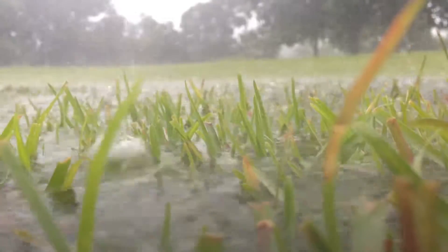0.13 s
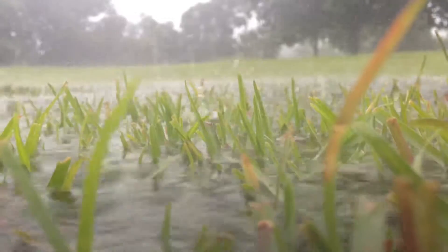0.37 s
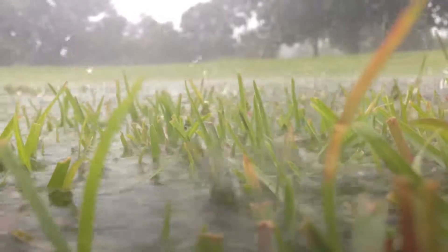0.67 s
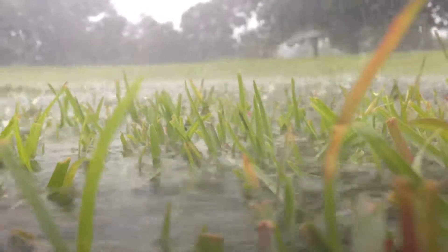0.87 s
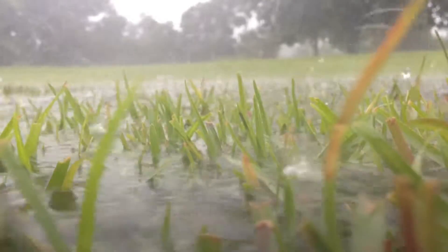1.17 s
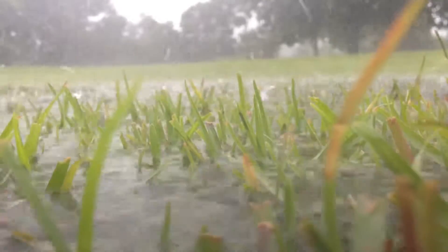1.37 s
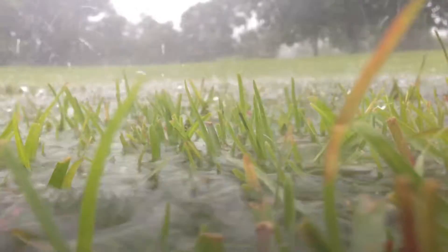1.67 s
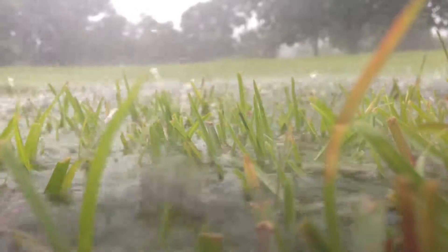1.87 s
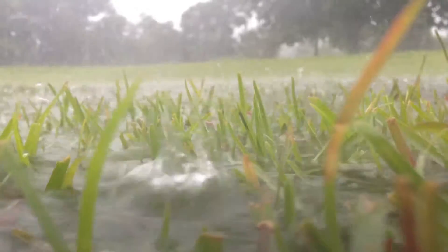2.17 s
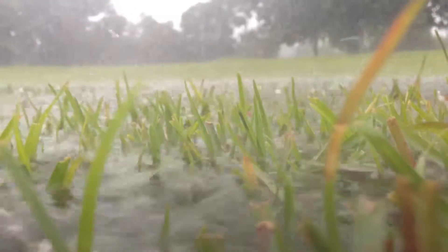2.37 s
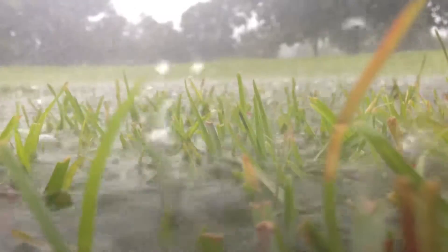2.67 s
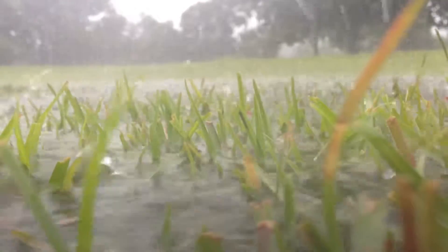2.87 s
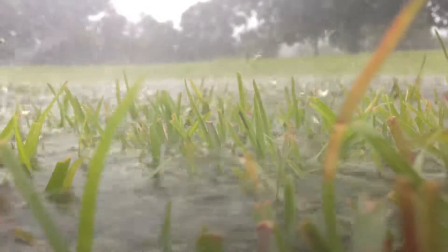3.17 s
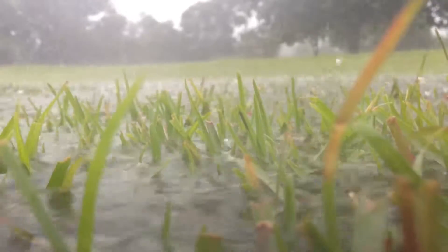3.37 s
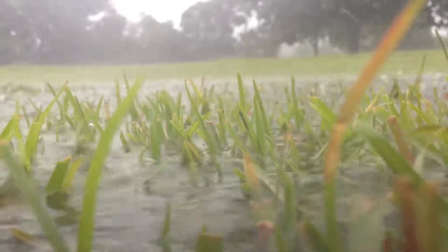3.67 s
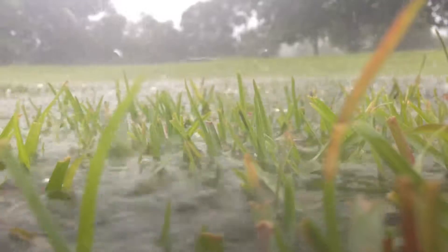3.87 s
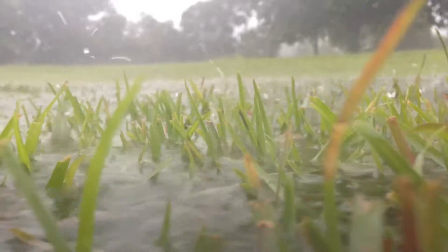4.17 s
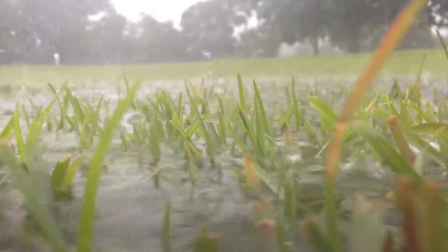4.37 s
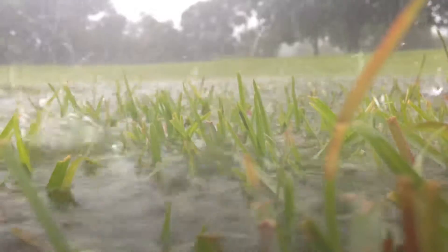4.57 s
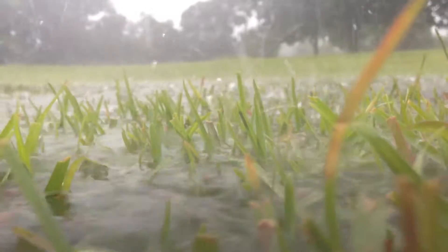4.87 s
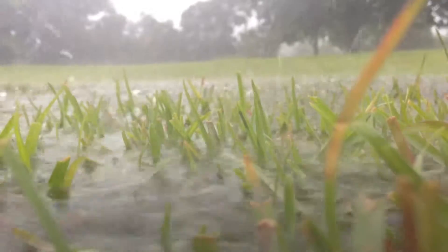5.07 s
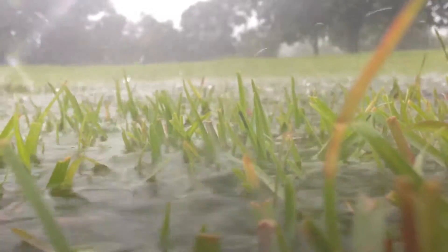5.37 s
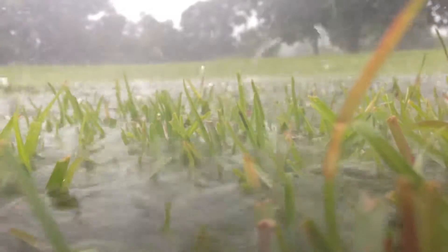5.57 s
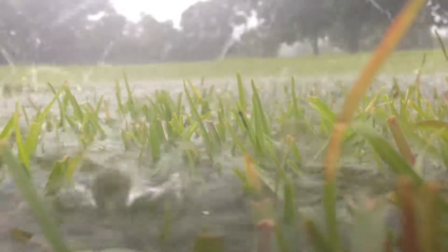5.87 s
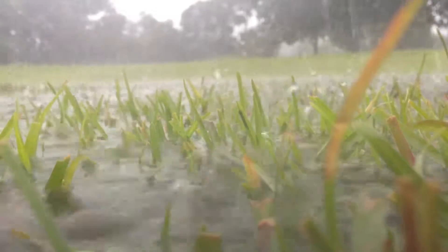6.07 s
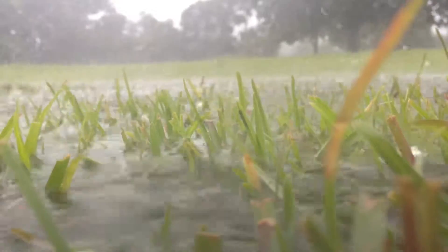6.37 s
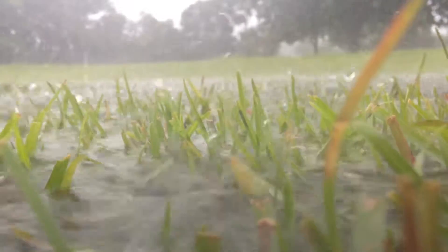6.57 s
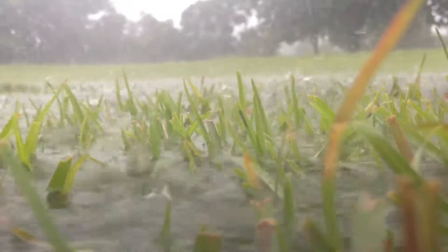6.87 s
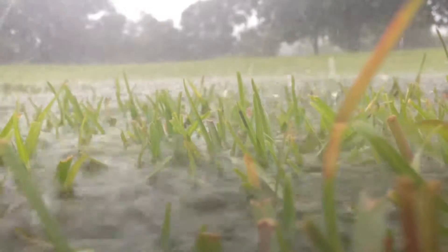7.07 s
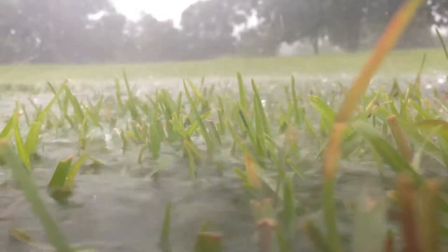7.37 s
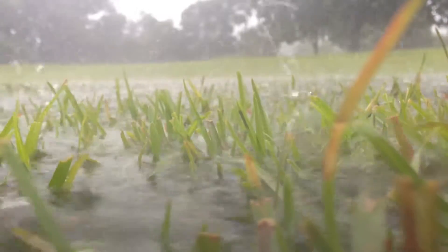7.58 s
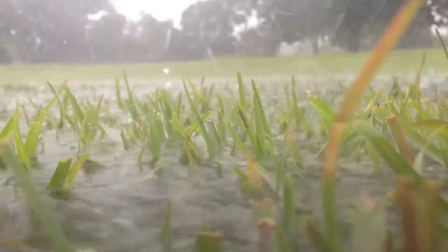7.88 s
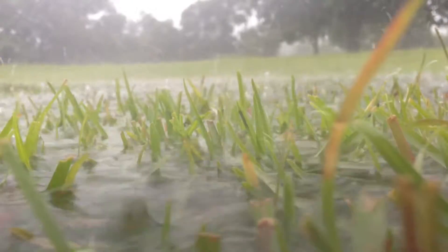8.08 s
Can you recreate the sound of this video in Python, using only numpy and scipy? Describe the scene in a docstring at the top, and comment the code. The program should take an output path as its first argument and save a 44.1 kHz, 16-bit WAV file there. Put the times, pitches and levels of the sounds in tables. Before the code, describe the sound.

Close, dull thumps and knocks of large raindrops strike a waterproof case several times a second, with the microphone shut inside it, low in waterlogged grass. Behind them runs the quieter, boxy patter of a downpour, sinking briefly after the hardest blows. Short pings, thin high ticks and a few faint bubble plinks are scattered throughout. The drops bunch into a quick cluster late on, and the rain keeps going.

```python
"""Heavy rain on a flooded lawn, heard from inside a sealed camera housing that stands in the water.
From the start, countless small drops make a muffled wash, while big ones thud and knock on the shell
and ring the air pocket in front of the microphone. After hard blows the wash ducks and creeps back.
Droplets tick as they burst on the wet port, the tube to the microphone: loudest near 3.5, 5.8 and
7.2 s. A last flurry of pings comes around 7.6 s, and the rain goes on to the end."""
import sys
import numpy as np
from scipy import signal
from scipy.fft import rfft, irfft, next_fast_len
from scipy.io import wavfile
from scipy.ndimage import uniform_filter1d, map_coordinates

SR = 44100
rng = np.random.default_rng(int(sys.argv[2]) if len(sys.argv) > 2 else 0)


def store_pcm(level_fs):
    """Save levels as 16-bit WAV."""
    pcm = np.round(np.clip(level_fs, -1, 1) * 32767).astype(np.int16)
    wavfile.write(sys.argv[1], SR, np.atleast_2d(pcm).T)


N = 363384

# Levels are starting values, before later shaping. "Loss" is how fast a ring dies away.
# strength of the background rain: t/s, wash level/dB, patter level/dB
RAIN_STRENGTH = [(0, -39, -43), (1, -43.5, -38), (2, -42.5, -42.5), (3, -43, -41.5), (4, -41, -40.5),
                 (5, -41, -41), (6, -41, -39), (7, -41.5, -42), (8.24, -41, -43.5)]
# tone colour of far rain through the shell: f/Hz, level/dB
WASH_COLOUR = [(18, -41.5), (30, -15.5), (90, -2), (130, -16.5), (213, -7.5), (591, -24), (970, -20.5),
               (1110, -24.5), (1550, -2), (1970, -19), (2760, -25.5), (3780, -40), (5310, -45),
               (15500, -56)]
# sudden dips of the background: t/s, depth/dB
BACKGROUND_DUCKS = [(0.04, 13), (0.91, 4.5), (1.235, 7), (1.589, 9), (2.075, 11), (2.29, 8.5), (4.05, 12.5),
                    (4.96, 3.5), (5.405, 12.5), (6.51, 4.5), (6.89, 12.5), (7.275, 6), (7.552, 12.5),
                    (7.618, 12.5)]
# notes the shell goes on ringing with: f/Hz, width/Hz, level/dB
SHELL_NOTES = [(210.8, 51, -5.5), (486, 36, -9), (861, 96, -4)]
# bubbles closing beside the port: t/s, level/dB, starting f/Hz, loss/dB per cycle
CLOSING_BUBBLES = [(1.2115, -24, 1750, 3), (2.256, -29, 1200, .9), (2.632, -34, 1400, 1),
                   (7.4115, -23, 1480, 3), (7.4315, -19, 1650, 4), (7.778, -24, 500, 4)]
# tiny bubbles that squeak in the port: t/s, level/dB
PORT_SQUEAKS = [(1.493, -35), (4.9653, -30.5), (5.0467, -30), (6.295, -34.5)]
# droplets bursting on the port: t/s, level/dB, f/Hz
PORT_TICKS = [(0.0287, -43, 4900), (0.033, -50.5, 4130), (0.1004, -45.5, 7400), (0.1613, -50, 8400),
              (.5285, -47, 6130), (.7356, -52, 4660), (0.909, -44.5, 4600), (0.9656, -48.5, 9000),
              (.9844, -40, 5100), (0.994, -36.5, 5800), (1.0072, -48, 7000), (1.0326, -43, 5500),
              (1.038, -39.5, 6300), (1.098, -42, 5440), (1.23, -45.5, 5540), (1.2722, -38.5, 10600),
              (1.2743, -42.5, 5040), (1.4142, -45, 6540), (1.5828, -42, 3870), (1.5917, -37, 3860),
              (1.601, -46, 4750), (1.69, -43.5, 5900), (1.741, -48.5, 7700), (1.7456, -51.5, 8900),
              (2.0752, -42, 3870), (2.519, -43.5, 8450), (2.6612, -48, 7000), (2.751, -24, 5440),
              (2.779, -20, 6450), (2.911, -41.5, 6400), (3.012, -48.5, 8340), (3.178, -37.5, 7060),
              (3.3687, -45, 3830), (3.505, -12.5, 6700), (4.045, -45.5, 4800), (4.252, -47.5, 3560),
              (4.3086, -37, 5960), (4.334, -52, 7300), (4.3428, -45.5, 7600), (4.396, -56, 5200),
              (4.527, -56, 7800), (4.625, -45, 4170), (4.7067, -49, 5900), (4.71, -39, 8600),
              (4.7118, -43, 5000), (4.7359, -41.5, 7200), (4.883, -44.5, 4100), (5.09, -31, 4700),
              (5.555, -40.5, 7060), (5.663, -40, 6700), (5.7601, -45, 5400), (5.7883, -13.5, 4840),
              (5.8088, -32, 7300), (5.8961, -28, 7800), (6.0457, -42, 6200), (6.495, -43, 6660),
              (6.512, -45, 5230), (6.6751, -46.5, 6200), (6.7598, -47, 9200), (6.9593, -42, 5230),
              (7.167, -11.5, 7180), (7.272, -40.5, 3800), (7.5332, -43, 5070), (7.537, -25.5, 3930),
              (7.5495, -42.5, 5400), (7.602, -50, 8200), (7.6113, -43.5, 5860), (7.6153, -40.5, 4500),
              (7.7375, -53, 6850), (7.9688, -49, 7800)]
# drops that ring the air pocket: t/s, level/dB, f/Hz, loss/dB per cycle
POCKET_PINGS = [(.0068, -20.5, 1430, 3.5), (0.0185, -12, 1310, 8), (.0235, -1, 1490, 5),
                (.0344, -2, 1530, 5), (.7358, -17, 1580, 5), (1.1542, -23.5, 1600, 2.5),
                (1.2319, -9, 1480, 3), (1.302, -17, 1380, 5), (1.4275, -8, 1520, 2.5),
                (1.4925, -15, 1470, 7.5), (1.5836, -4, 1470, 3), (1.5913, -8, 1420, 2.5),
                (1.6018, -18.5, 1520, 3.5), (1.7462, -15.5, 1500, 7), (2.0748, -3.5, 1450, 7),
                (2.291, -1.5, 1420, 10), (2.4046, -23.5, 1300, 2.5), (2.6442, -21.5, 1680, 1.5),
                (2.7285, -22, 1530, 2.5), (2.7762, -14.5, 1560, 5.5), (3.1787, -15.5, 1510, 7),
                (3.3688, -22.5, 1550, 2.5), (3.5048, -6, 1497, 3), (3.515, -24.5, 1534, -0.5),
                (3.5212, -15, 1580, 4.5), (3.7611, -13.5, 1430, 7.5), (3.847, -23.5, 1426, 1.5),
                (4.0458, -6, 1444, 4), (4.3624, -9.5, 1460, 2.5), (4.7366, -24.5, 1446, 2.5),
                (4.8823, -12.5, 1510, 2), (4.9642, -3, 1530, 4), (4.9913, -11, 1330, 11),
                (5.0471, -17, 1550, 7.5), (5.0899, -11, 1590, 13.5), (5.4004, -12, 1530, 2),
                (5.5542, -13, 1510, 4.5), (5.6604, -18.5, 1480, 3.5), (5.7843, -13, 1360, 5),
                (5.7906, -16, 1270, 7), (5.8109, -14.5, 1420, 7), (5.917, -24, 1560, 1.5),
                (6.295, -19, 1520, 2.5), (6.381, -16, 1310, 3.5), (6.4944, -14, 1530, 2.5),
                (6.5112, -11, 1400, 4), (6.8857, -6.5, 1507, 3), (6.9954, -16.5, 1500, 1.5),
                (7.1671, -13.5, 1780, 6), (7.2727, -5, 1400, 6.5), (7.5336, -14, 1590, 5),
                (7.5369, -0.5, 1570, 5), (7.5497, -7, 1520, 4.5), (7.5561, -23, 1330, 2),
                (7.614, -29, 1540, 8), (7.6153, -2, 1540, 7), (7.7378, -25.5, 1470, 5.5)]
# big drops on the shell: t/s, then level/dB, f/Hz, loss/dB per cycle for the thud and again for the knock
BIG_DROPS = [(0.014, -13, 217, 29, -21, 590, 3), (0.0183, -8.5, 127, 44, -3, 590, 26),
             (0.022, -33, 242, 15, -1, 543, 13.5), (0.034, -29, 314, 7, -18, 1020, 30),
             (0.3331, -3, 114, 47, -13, 345, 21), (0.634, -26, 194, 10.5, -20, 682, 32),
             (0.6947, -25, 240, 16, -27, 375, 7.5), (0.7694, -7, 104, 28, -16, 433, 35),
             (0.801, -30, 240, 8, -24, 682, 33), (0.8429, -39, 310, 16, -4, 536, 30),
             (0.8912, 1.5, 173, 45, -9, 380, 9.5), (0.9087, 13, 110, 45.5, -16, 344, 5),
             (0.9659, -16, 79, 16, -5, 320, 30), (0.9774, -12.5, 83.4, 22, 2.5, 320, 30),
             (0.984, -8, 104, 47, -11.5, 412, 17), (1.1031, -7.5, 118, 24, -33, 391, 4),
             (1.1546, 7.5, 103, 41.5, -2.5, 570, 22), (1.214, -23, 170, 2, -40, 337, 3),
             (1.23, -25, 200, 30, 1, 900, 25), (1.2313, 9, 81, 51, 15, 403, 37),
             (1.2366, -10.5, 264, 8.5, 4.5, 497, 25.5), (1.247, -24.5, 174, 3, -17, 320, 20),
             (1.2733, -3.5, 126, 37, 1.5, 320, 25), (1.287, -27.5, 213, 5.5, -19, 391, 11.5),
             (1.302, 4, 145, 27.5, 1.5, 510, 22), (1.3108, -26, 208, 13, -7, 1020, 32),
             (1.347, -9, 86, 43, -36, 372, 1), (1.4271, -49, 152, 1, 1, 940, 24),
             (1.5829, -6.5, 106, 20, 9, 930, 28), (1.591, -12, 265, 5, 1.5, 793, 10),
             (1.7113, 0.5, 120, 39, -26, 510, 11), (1.7453, -10, 110, 26, -20, 455, 37),
             (1.786, -15, 143, 41, -16, 320, 32), (1.816, -18, 118, 31, -5.5, 375, 30),
             (1.871, -14.5, 110, 33, -47, 504, 11), (2.024, -24.5, 134, 12, -22, 391, 19),
             (2.065, -20, 77.5, 8, 10, 440, 43), (2.0746, -0.5, 123, 28, 13.5, 510, 41),
             (2.2283, -7, 118, 43, -51, 965, 2), (2.2905, 3.5, 108, 43, 7.5, 324, 21.5),
             (2.2986, -28, 126, 13, -3.5, 326, 20), (2.306, -12.5, 173, 24, -30, 320, 10),
             (2.325, -17, 85.4, 38, -27, 555, 29), (2.3815, 0, 135, 34, -2.5, 490, 20),
             (2.3942, -14, 80, 11, -14.5, 360, -4), (2.4044, -4.5, 276, 11.5, 6, 590, 19.5),
             (2.4119, -15.5, 230, 14, -44, 586, 9), (2.515, -21, 162, 18, -38.5, 530, 4),
             (2.5736, -9, 99, 48, -36.5, 535, 4), (2.7091, -11.5, 80.5, 39, -31, 590, 0.5),
             (2.751, -44, 134, 20, -6, 1020, 26), (2.756, -7, 91, 39, -45, 504, 3),
             (2.765, -21, 109, 24, -32, 504, 2), (2.7766, -24, 111, 21, -1.5, 905, 28),
             (2.786, -8, 228, 13, -1, 717, 45), (3.0507, 4.5, 80.6, 52, -24, 385, 2.5),
             (3.0656, -20.5, 180, 7, -24, 468, 3), (3.0739, -19, 80, 24, -30, 330, 1),
             (3.085, -25, 160, 3, -5, 352, 26), (3.114, -22, 173, 29, -12, 320, 32),
             (3.1764, -10, 118, 55, -10.5, 414, 16), (3.3183, -19, 134, 24, -8, 320, 37),
             (3.4308, -23, 228, 7.5, -29, 557, 35), (3.5045, -6.5, 243, 39, -16.5, 970, 3),
             (3.5248, 1.5, 118, 42, 4.5, 287, 28), (3.5709, -11, 143, 47, -10, 337, 32),
             (3.6354, -33, 244, 2, -35, 616, 36), (3.7618, -9, 103, 50, -10.5, 500, 17),
             (3.847, -16.5, 84.6, 49, 11, 540, 41), (3.8769, -14, 112, 20, -10, 336, 18.5),
             (3.964, -21, 197, 17, -31, 394, 3), (3.989, -14, 152, 29, -7.5, 320, 26),
             (4.0451, -1.5, 197, 39, 7.5, 446, 29.5), (4.081, -20.5, 150, 32, -27, 500, 20),
             (4.127, -22, 85, 48, -13, 506, 11.5), (4.265, -5, 122, 49.5, -15, 330, 12.5),
             (4.3598, 6.5, 88.5, 56, -17, 366, 10), (4.3631, -14.5, 276, 9, 2.5, 517, 15.5),
             (4.6494, -22, 221, 16.5, -35, 396, -1), (4.709, -8.5, 131, 36, -4, 317, 19.5),
             (4.741, -17, 185, 41, -22, 380, 13), (4.8818, 10.5, 138, 41, -9, 344, 1),
             (4.927, -21, 207, 7, -27, 455, 19), (4.9645, -30, 194, 0, 4, 1010, 38),
             (4.9894, 8, 168, 44, 3, 440, 36), (4.997, -16.5, 250, 5.5, -20, 320, 24),
             (5.0337, 0, 127, 38, -21, 610, 4.5), (5.04, -5, 80, 50, -24, 800, 6),
             (5.0657, -15.5, 127, 15, -2, 358, 21), (5.108, -22, 85, 16, -49, 372, 9),
             (5.3092, -21.5, 239, 13, -19, 1020, 30), (5.357, -24, 80, 23, -33, 479, 2),
             (5.375, -10.5, 178, 34, -1.5, 350, 34), (5.4002, -2.5, 78, 40, 10.5, 614, 24.5),
             (5.466, -17, 105, 40, -27, 320, 34), (5.492, -16.5, 111, 40, -51, 372, 10),
             (5.5542, -28, 90, 17, -26, 1070, -3), (5.561, -2, 114, 39, -43, 374, 18),
             (5.6657, -13.5, 118, 24, -23.5, 475, 5), (5.7147, -15, 118, 31, -3.5, 342, 21.5),
             (5.7494, 1, 110, 48, -33, 527, 3), (5.784, 8, 143, 60, -5, 496, 3.5),
             (5.7866, -9, 240, 8.5, -13.5, 600, 1), (5.7929, -32, 272, 7, -8, 455, 16),
             (5.8038, -26, 225, 7, -27, 433, 16), (5.8155, 6, 132, 43, -9, 305, 18),
             (5.8248, -15.5, 250, 6.5, -8, 890, 40), (6.0383, -19.5, 110, 24, -38, 530, 3),
             (6.085, -15.5, 213, 9.5, -26, 586, 9.5), (6.2367, -11.5, 134, 36, -9, 327, 20.5),
             (6.3805, 0, 112, 51, -5, 513, 7.5), (6.383, -7, 300, 37, -13, 560, 12),
             (6.4532, 2, 126, 40, 2, 320, 29), (6.474, -8, 80, 47, -29, 648, 6),
             (6.484, -13, 85, 22, -21, 455, 4.5), (6.4983, -22, 80, 29, -3.5, 320, 29),
             (6.509, 12.5, 104, 48, -29, 530, 2), (6.5209, -22.5, 173, 3.5, -26, 320, 14),
             (6.5811, -9.5, 253, 7.5, 11, 530, 30.5), (6.644, -6.5, 197, 43, -13.5, 500, 1),
             (6.674, -19, 223, 19, -21, 372, 11.5), (6.799, -29.5, 171, 8, -38, 320, 3),
             (6.8665, -26, 119, 13, -11, 320, 40), (6.8854, -2.5, 316, 40, 4.5, 557, 17),
             (6.9948, -0.5, 81.4, 41, -11.5, 496, 13), (6.9949, -25, 200, 37, -2, 526, 30),
             (7.0002, -8, 242, 47, -26, 940, 34), (7.0668, 1.5, 130, 25, -13, 540, 24),
             (7.1057, -14, 110, 43, -44, 970, 9), (7.1465, -18.5, 244, 8, -9.5, 606, 28),
             (7.1671, -10, 118, 44, -6, 393, 23), (7.193, -9.5, 80, 44, -38, 410, 2),
             (7.2208, -25, 240, 11, -8.5, 500, 17.5), (7.272, 8.5, 116, 50.5, -1.5, 425, 15.5),
             (7.424, -11.5, 111, 41, -13.5, 318, 26), (7.5369, -29, 118, 13, -3, 815, 25),
             (7.5495, 4, 280, 31, 1.5, 470, 18.5), (7.565, -19, 110, 26, -29, 560, 7),
             (7.597, -23.5, 130, 35, -42, 400, 22), (7.6152, -40, 255, 1, -20, 1020, 28),
             (7.6826, -18.5, 210, 22, -19, 1020, 32), (7.7692, -17, 180, 37, -15, 417, 17),
             (7.773, -5, 170, 36, -8.5, 370, 10.5), (7.885, -23, 204, 40, -29, 600, 23),
             (8.0023, -22.5, 80, 27, -24.5, 754, 12), (8.031, -32, 200, 31, -27, 450, 20),
             (8.0684, -5.5, 108, 35, -33, 325, 17), (8.1148, -8.5, 98, 29, -16.5, 324, 16)]
# the crown of each splash falling back: delay/s, level against the thud/dB, f/Hz, loss/dB per cycle
CROWN_FALLBACK = [(.0062, -14, 247, 51), (.0068, -30, 356, 19)]
# echo from the port's far end: delay/s, share sent back
TUBE_ECHO = (77e-6, 0.47)

HISS_DB = -72.5  # the microphone's own noise
RECOVERY_S = 0.64  # time for a duck's depth in dB to shrink to about a third
SQUEAK_HZ, SQUEAK_LOSS_DB = 8550, 4.5  # pitch, loss per cycle
TICK_LOSS_DB, TICK_HARDENS = 11, 0.24  # loss per cycle of a middling tick, extra loss per dB of strength
LEAST_LOSS_DB = 5  # per cycle; the wet shell never swings more freely than this
CEILING, TOP_HZ = .77, 15400  # the microphone's limits: peak size, highest pitch


def amp(db):
    """Turn decibels into a number to multiply by."""
    return 10 ** (np.asarray(db) / 20)


def unit(x):
    """Scale a sound to an average power of one."""
    return x / np.sqrt(np.mean(x ** 2) + 1e-20)


def filtered(x, response):
    """Colour a sound; response(hz) says how much of each frequency gets through."""
    size = next_fast_len(N + 8192)
    hz = np.fft.rfftfreq(size, 1 / SR)
    return irfft(rfft(x, size) * response(hz), size)[..., :N]


def wobble(rate):
    """A smooth random curve through `rate` points a second."""
    points = rng.standard_normal(int(N * rate / SR) + 4)
    return map_coordinates(points, [np.arange(N) * rate / SR])


def rows(s, db, hz, loss_db):
    """Make rows for rings(); a single value serves every row."""
    return np.transpose(np.broadcast_arrays(s, db, hz, loss_db))


def rings(events, rise, count, rough=0, climb=0):
    """One fading tone, `count` samples long, for each row of t/s, level/dB, f/Hz, loss/dB per cycle."""
    s, db, hz, loss_db = np.transpose(events)[:, :, None]
    samples = np.ceil(s * SR) + np.arange(count)
    cycles = hz * (samples / SR - s)
    swing = np.sin(2 * np.pi * cycles * (1 + climb * cycles / 2))  # climb: pitch gain per cycle
    splash = rough * rng.standard_normal(cycles.shape)
    onset = (1 - np.exp(-cycles / rise)) ** 2  # water lands softly; rise is in cycles
    decay = amp(db - cycles * np.clip(loss_db, .3, 60))
    ending = np.minimum(np.arange(count, 0, -1) * 8 / count, 1)
    tones = decay * onset * ending * (swing + splash)
    return np.bincount(samples.astype(int).ravel(), tones.ravel(), N + count + SR)[:N]  # add them all up


def shower(hz, spread, loss_db, scatter_db, count):
    """Rows for drops at random times, pitched around hz, a few much bigger than the rest."""
    when, size = rng.random((count, 2)).T
    pitch_luck, loss_luck = rng.standard_normal((count, 2)).T
    size_db = np.minimum(-scatter_db * np.log(1 - size), 15)
    pitch = np.clip(hz * np.exp(spread * pitch_luck), 50, 15000)
    return rows(when * N / SR, size_db, pitch, loss_db * np.exp(0.37 * loss_luck))


def port(x):
    """The short wet tube: fine spray trails each sound, an echo notches the treble, the top rolls off."""
    delay, share = TUBE_ECHO
    t = np.arange(400) / SR
    spray = amp(-21.5 - 60 * t / 0.01) * rng.standard_normal(len(t))
    x = x + signal.fftconvolve(x, spray)[:N]
    gain = amp(12.5)  # the narrow tube concentrates the pressure
    echo = lambda hz: share * np.exp(-2j * np.pi * hz * delay)
    return filtered(x, lambda hz: gain * (1 + echo(hz)) / (1 + 1j * hz / 11000) ** 4)


def shell(x):
    """The thick shell dulls each blow and rings on after it."""
    def response(hz):
        ringing = sum(amp(db) * 1j * hz * width / (note ** 2 - hz ** 2 + 1j * hz * width)
                      for note, width, db in SHELL_NOTES)
        dulling = 1 - (hz / 3200) ** 2 + 1.4j * hz / 3200
        return (1 + ringing) / dulling
    return filtered(x, response)


def wash():
    """Far rain: noise with shifting louder patches, coloured by the shell and the air pocket."""
    spectrum = signal.stft(rng.standard_normal(N), nperseg=256)[2]
    patches = uniform_filter1d(rng.standard_normal(spectrum.shape), 4, axis=0)  # smooth across pitch
    patches = uniform_filter1d(patches, 8, axis=1)  # and across time
    noise = signal.istft(spectrum * amp(1.6 * unit(patches)), nperseg=256)[1][:N]
    hz, db = np.transpose(WASH_COLOUR)
    return unit(filtered(noise, lambda f: amp(np.interp(np.log(f + 1), np.log(hz + 1), db))))


def patter():
    """Smaller drops on and around the shell: soft thuds, knocks, pings, plinking bubbles and spray."""
    thuds = rings(shower(149, 0.46, loss_db=18, scatter_db=2, count=500), rise=0.24, count=1500)
    knocks = rings(shower(529, 0.41, loss_db=7, scatter_db=3, count=900), rise=0.052, count=700)
    pings = rings(shower(1500, 0.11, loss_db=9, scatter_db=2.5, count=4000), rise=0.93, count=600)
    small_bubbles = shower(2350, 0.15, loss_db=8.5, scatter_db=5.5, count=3000)
    plinks = rings(small_bubbles, rise=0.79, climb=0.027, count=300)
    droplets = shower(5700, 0.44, loss_db=9.5, scatter_db=1, count=6000)
    spray = port(rings(droplets, rise=0.1, rough=.15, count=120))
    return (amp(-1.5) * unit(thuds) + amp(-11.5) * unit(knocks) + amp(-5.5) * unit(pings)
            + amp(-19) * unit(plinks) + amp(-30) * unit(spray))


def ducking():
    """At each listed time the background drops at once and creeps back; the deepest dip rules."""
    t = np.arange(N) / SR
    dips_db = [db * (t > s) * np.exp(-np.maximum(t - s, 0) / RECOVERY_S) for s, db in BACKGROUND_DUCKS]
    return amp(-np.max(dips_db, axis=0))


def bubbles():
    """Bubbles close beside the port and ring with a climbing pitch."""
    return rings(CLOSING_BUBBLES, rise=1.5, climb=.017, count=1100)


def squeaks():
    """Tiny bubbles in the port ring very high and very briefly."""
    s, db = np.transpose(PORT_SQUEAKS)
    return rings(rows(s, db, SQUEAK_HZ, SQUEAK_LOSS_DB), rise=0.35, count=160)


def ticks():
    """Droplets burst on the port: big ones are dull cracks, small ones ring."""
    s, db, hz = np.transpose(PORT_TICKS)
    loss_db = TICK_LOSS_DB + TICK_HARDENS * (db - db.mean())
    return -rings(rows(s, db, hz, loss_db), rise=0.1, rough=0.095, count=160)  # pressure falls first


def pocket_pings():
    """Drops ring the air pocket; the film of water over it shifts the pitch from drop to drop."""
    return rings(POCKET_PINGS, rise=0.31, count=800)


def big_drops():
    """Big drops hit the shell: the wide splash thuds, the tight core knocks, the crown falls back."""
    s, thud_db, thud_hz, thud_loss_db, knock_db, knock_hz, knock_loss_db = np.transpose(BIG_DROPS)
    thuds = rows(s, thud_db, thud_hz, np.maximum(thud_loss_db, LEAST_LOSS_DB))
    crowns = [rows(s + delay, thud_db + db, hz, loss_db) for delay, db, hz, loss_db in CROWN_FALLBACK]
    knocks = rows(s, knock_db, knock_hz, np.maximum(knock_loss_db, LEAST_LOSS_DB))
    return rings(np.vstack([thuds, *crowns]), rise=.1, count=1500) + rings(knocks, rise=.33, count=1000)


def scene():
    """Lay the near drops over the swelling, ducking background, in one channel."""
    t = np.arange(N) / SR
    s, wash_db, patter_db = np.transpose(RAIN_STRENGTH)
    gust_db = wobble(2.2)
    swell_db = gust_db + .8 * wobble(12)
    far = amp(np.interp(t, s, wash_db) + swell_db) * wash()
    around = amp(np.interp(t, s, patter_db) + 0.34 * gust_db) * patter()
    hiss = amp(HISS_DB) * rng.standard_normal(N)
    background = ducking() * (far + around + hiss)
    near = shell(big_drops() + pocket_pings() + bubbles()) + port(ticks() + squeaks())
    return (background + near)[None]


def record(dry):
    """The microphone loses the deep bass, rounds off the biggest peaks and cuts the highest treble."""
    bass_cut = signal.butter(2, 62, "high", fs=SR, output="sos")
    rumble_cut = signal.butter(2, 38, "high", fs=SR, output="sos")
    thinned = signal.sosfilt(np.vstack([bass_cut, rumble_cut]), dry)
    rounded = thinned / (1 + np.abs(thinned / CEILING) ** 6) ** (1 / 6)
    return filtered(rounded, lambda hz: hz < TOP_HZ)


dry = scene()
out = record(dry)
store_pcm(out)
```